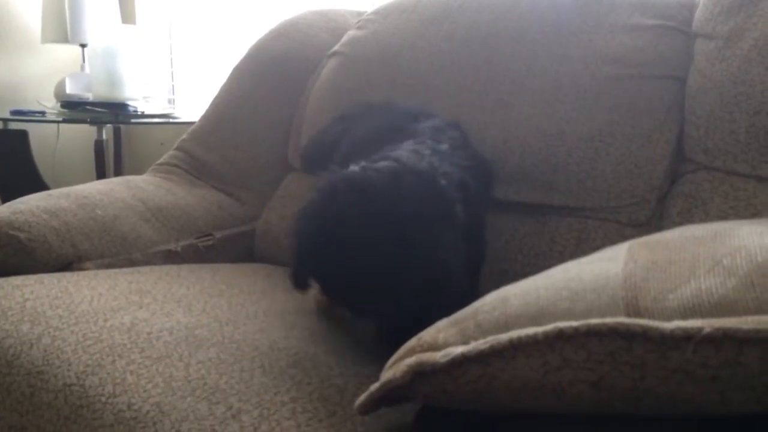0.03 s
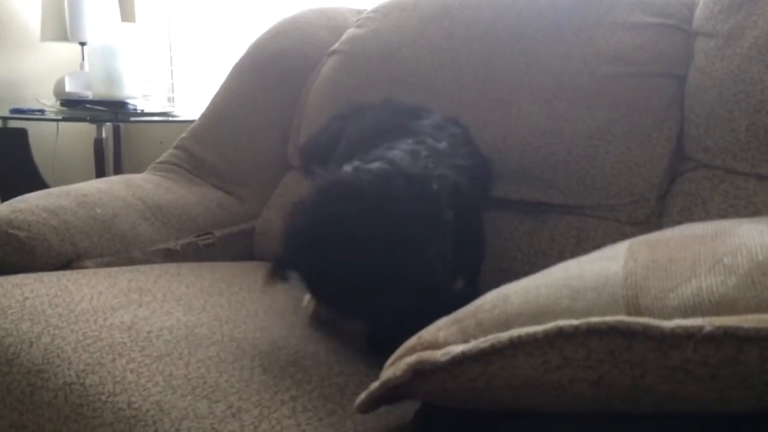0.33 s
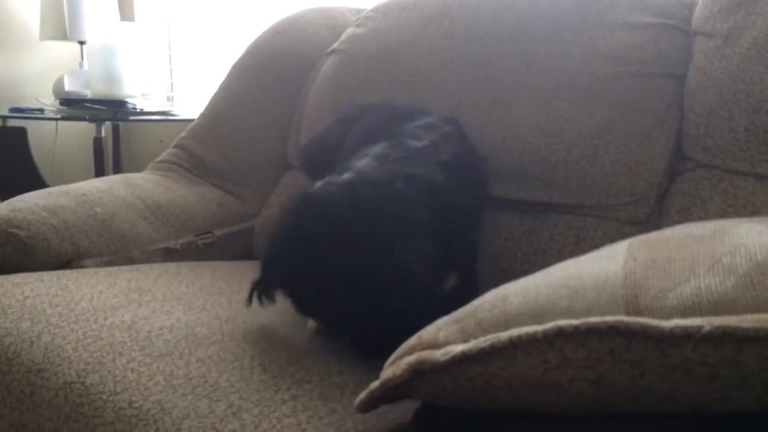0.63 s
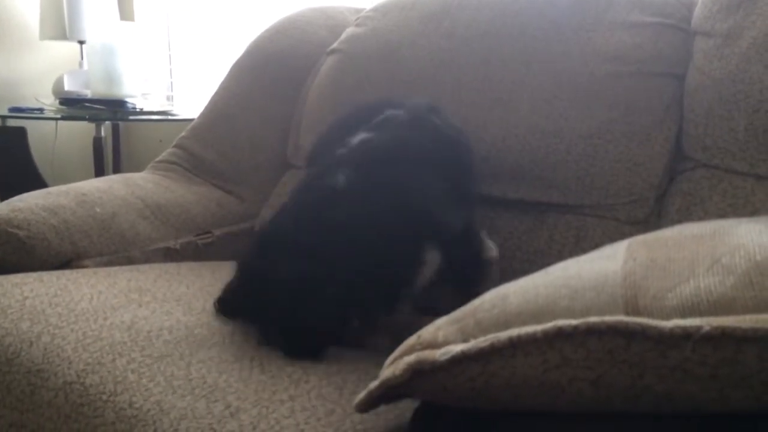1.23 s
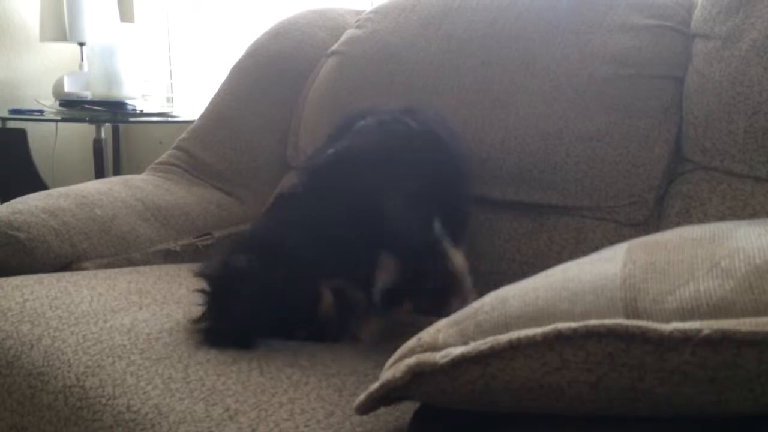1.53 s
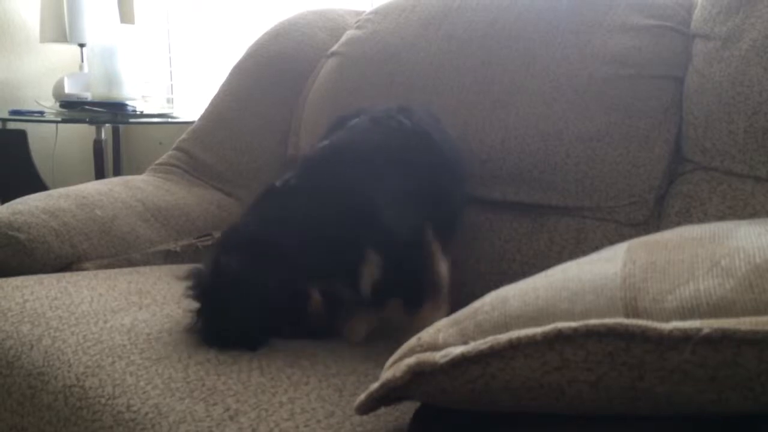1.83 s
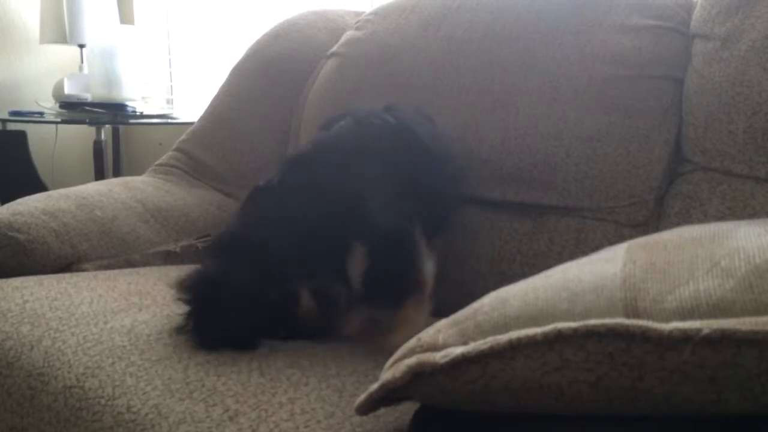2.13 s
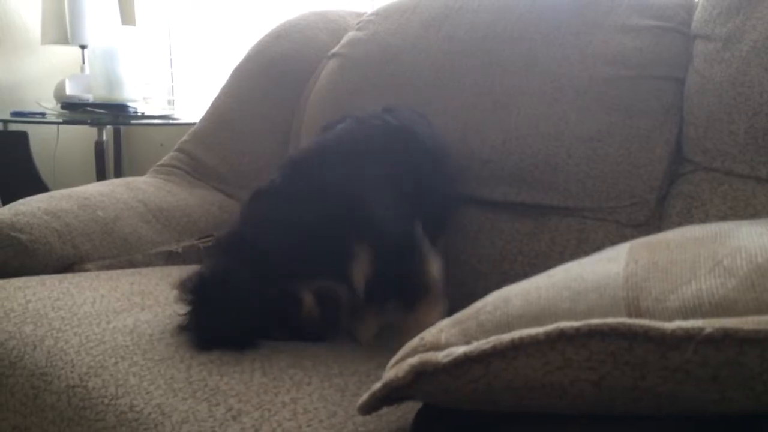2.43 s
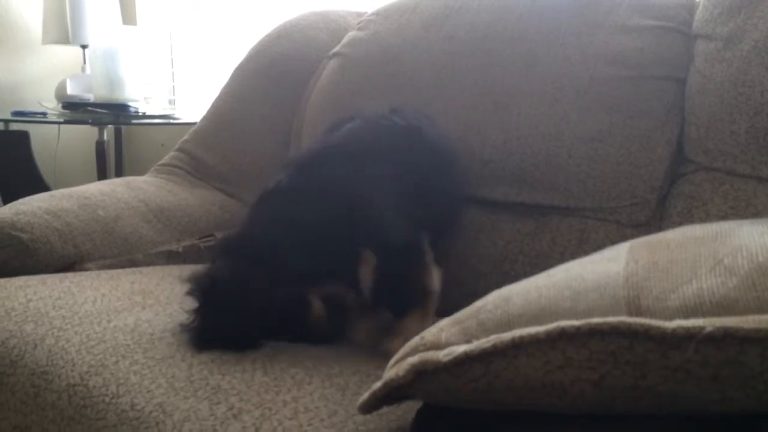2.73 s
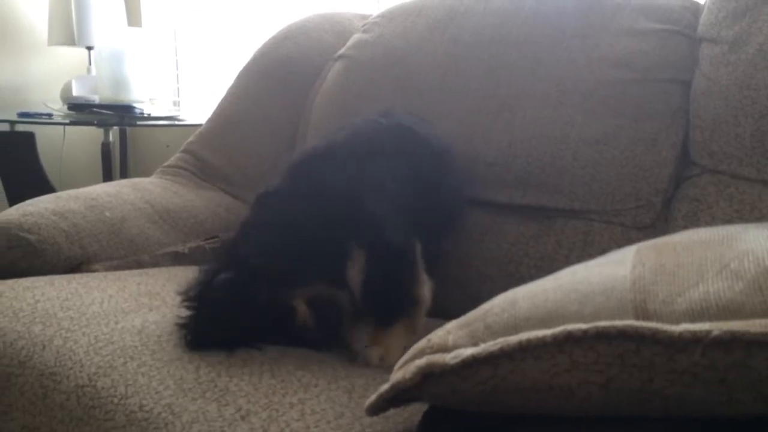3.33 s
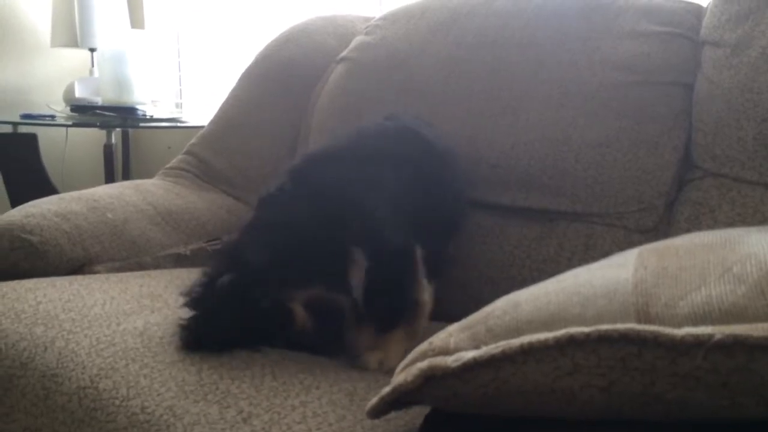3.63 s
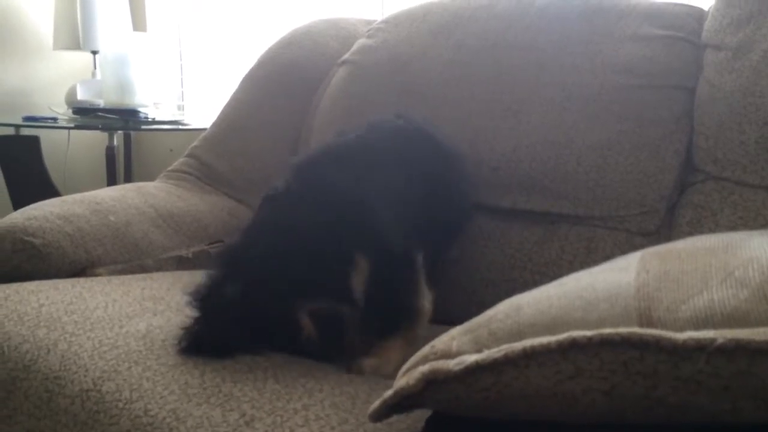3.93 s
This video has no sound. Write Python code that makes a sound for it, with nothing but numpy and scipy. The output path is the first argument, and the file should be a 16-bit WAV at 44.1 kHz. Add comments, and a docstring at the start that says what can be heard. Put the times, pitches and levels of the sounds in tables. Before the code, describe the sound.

A dog scratches at a couch cushion, first with a few spaced swipes, then digging quickly with both paws. Claws scrape and pluck the cloth over soft, padded thumps, in a quiet room with a faint steady rumble.

```python
"""A quiet living room, where a small dog digs at a couch cushion: a few slow swipes, then both paws in turn.
The claws stick and slip over the tight cloth while the pads brush it; now and then a claw snags
and plucks it. The stuffing thumps under the paws, the hardest pushes drum the cover,
and the room echoes faintly over its own steady noise."""
import sys
import numpy as np
from scipy import signal
from scipy.io import wavfile

SR = 44100
rng = np.random.default_rng(int(sys.argv[2]) if len(sys.argv) > 2 else 0)


def store_pcm(level_fs):
    """Save levels as 16-bit WAV."""
    pcm = np.round(np.clip(level_fs, -1, 1) * 32767).astype(np.int16)
    wavfile.write(sys.argv[1], SR, np.atleast_2d(pcm).T)


N = 176400  # 4 seconds

SLIPS_PER_S, SLIP_JITTER, SLIP_SPREAD_DB = 290, .3, 1.66
SAG_OCTAVES, PITCH_SPREAD_OCTAVES = 0.42, 0.37  # the cloth's note sinks along each stroke
# The tone of the cloth and of its fine fibres. Each row: frequency in Hz, boost or cut in dB.
CLOTH_TONE = [(40, -14), (110, 6), (200, -1.5), (285, -1), (400, 0.5), (640, -1.5), (830, -3), (1300, 0.5),
              (2000, -0.5), (3000, -7), (6000, -25), (15000, -22)]
FIBRE_TONE = [(60, -23), (250, 1), (700, 6), (1300, -3.5), (2000, -14), (3000, -25), (6000, -37),
              (15000, -62)]
# The paw strokes. Each row: start in seconds, length in seconds, scrape level in dB,
# brush level in dB, the cloth's pitch at mid-stroke in Hz.
PAW_STROKES = [(-.04, 0.059, -36.5, -81, 533), (0.193, 0.078, -34.3, -59.5, 563),
               (.451, 0.063, -35.5, -61.5, 504), (0.563, 0.068, -62, -70.5, 493),
               (.715, .067, -40.5, -63.5, 570), (1.163, 0.074, -40.5, -71, 470),
               (1.333, 0.049, -47, -71.5, 457), (1.485, 0.072, -43, -67.5, 470),
               (1.667, 0.042, -44, -69, 352), (1.806, 0.057, -39.5, -65, 440),
               (1.966, 0.051, -42.5, -68.5, 450), (2.112, 0.066, -44.5, -67.5, 430),
               (2.27, 0.059, -46.5, -69.5, 480), (2.421, 0.058, -39.5, -66, 530),
               (2.573, 0.041, -44, -69, 480), (2.694, 0.12, -53.5, -72.5, 420),
               (2.885, 0.051, -44.5, -65.5, 494), (3.058, 0.043, -43.5, -65, 484),
               (3.188, 0.046, -39.5, -64.5, 514), (3.389, 0.041, -48, -75, 460),
               (3.492, 0.055, -42.5, -63.5, 575), (3.683, 0.047, -48.5, -72.5, 418),
               (3.815, 0.039, -39.5, -62.5, 620), (3.977, 0.063, -47, -60.5, 500)]


def claw_scrapes():
    """Claws slip from thread to thread in an uneven run of tiny plucks, while the fibres crackle."""
    out, t = np.zeros(N), np.arange(SR // 4) / SR
    for start, length, db, _, hz in PAW_STROKES:
        gaps, sizes, detunes = rng.standard_normal((3, 120))
        slip_times = np.cumsum(np.exp(SLIP_JITTER * gaps)) / SLIPS_PER_S
        slips = np.zeros(len(t))
        for at, size, detune in zip(slip_times, sizes, detunes):
            octaves = SAG_OCTAVES * (.5 - min(at / length, 1)) + PITCH_SPREAD_OCTAVES * detune
            strength = amp(SLIP_SPREAD_DB * np.clip(size, -2, 1))
            add(slips, at, strength * pluck(hz * 2 ** octaves, cycles=0.54))
        cloth = unit(colour(slips - slips.mean(), CLOTH_TONE))
        fibres = unit(colour(crackle(len(t), per_s=2500, spread_db=9), FIBRE_TONE))
        push = paw_pressure(t, length, rise=0.27, release=0.29, tail_s=0.0094)
        add(out, start, amp(db) * (cloth + amp(-7) * fibres) * push)
    return out


BRUSH_LEAD_S, SWIPES_END_S = 0.013, 1  # pads touch before the claws; the opening swipes end
WEAVE_HZ = (9200, 10100)
# The tone of the brushing. Each row: frequency in Hz, boost or cut in dB.
BRUSH_TONE = [(200, -26), (1200, -0.5), (2500, 7.5), (4000, 2.5), (6000, -2.5), (10000, -5.5), (12500, -9),
              (15000, -9)]


def pad_brushing():
    """Pads and fur hiss over the cloth on each stroke; the opening swipes make the weave zip, the loudest swipe
    most of all."""
    t, swipes, digs = np.arange(N) / SR, np.zeros(N), np.zeros(N)
    for start, length, _, db, _ in PAW_STROKES:
        age, span = t - start + BRUSH_LEAD_S, length + BRUSH_LEAD_S
        if start < SWIPES_END_S:  # a swipe lands already moving and fades as the paw slows
            fade_db = -2.5 * np.clip(age / span, 0, 1)
            swipes += amp(db + fade_db) * paw_pressure(age, span, rise=0.37, release=0.049, tail_s=0.043)
        else:  # a digging paw sets down first, so its hiss builds more slowly
            digs += amp(db) * paw_pressure(age, span, rise=0.61, release=0.049, tail_s=0.045)
    hiss = unit(colour(crackle(N, per_s=3000, spread_db=3.5), BRUSH_TONE))
    noise = rng.standard_normal(N)
    zipping = unit(sum(resonate(noise, hz, width_hz=520) for hz in WEAVE_HZ))
    zip_level = amp(-8) * swipes ** 2 / swipes.max()
    return (swipes + digs) * hiss + zip_level * zipping


# The snags. Each row: start in seconds, level in dB, pitch in Hz.
CLAW_SNAGS = [(.016, -26, 533), (0.2034, -32, 850), (0.2091, -29, 600), (.2464, -28, 760),
              (.449, -32.5, 650), (.7483, -31.5, 580), (1.1983, -25.5, 480), (1.535, -29, 400),
              (1.789, -35.5, 704), (1.8101, -21.5, 690), (1.852, -35.5, 450), (2.105, -31, 650),
              (2.151, -26.5, 506), (2.4124, -22, 640), (2.4462, -25, 617), (2.4857, -32.5, 380),
              (2.7286, -33, 640), (2.744, -33.5, 630), (2.9034, -30, 1050), (3.0557, -30.5, 543),
              (3.0855, -31, 543), (3.181, -39, 600), (3.3207, -37, 744), (3.367, -31, 527),
              (3.6406, -33.5, 680), (3.689, -29.5, 560), (3.8238, -28, 724), (3.9423, -34, 460),
              (3.979, -22.5, 705)]


def claw_snags():
    """A claw catches the cloth and lets go with one hard pluck."""
    pops = np.zeros(N)
    for start, db, hz in CLAW_SNAGS:
        add(pops, start, amp(db) * pluck(hz, cycles=0.53))
    return colour(pops, CLOTH_TONE)


TICK_DECAY_S = 0.00095
SNAP_AT_S, SNAP_DB, SNAP_HZ, SNAP_DECAY_S = 2.4855, -41.5, 4000, .00055
# The tone of a tick. Each row: frequency in Hz, boost or cut in dB.
TICK_TONE = [(300, 10), (2500, 4), (4200, 7.5), (7500, 9.5), (11000, 8), (15000, -2)]
# The ticks. Each row: start in seconds, level in dB before the tone is applied.
CLAW_TICKS = [(.269, -59), (.449, -57.5), (.715, -59.5), (0.719, -61), (.735, -59), (2.448, -61),
              (2.4856, -50.5)]


def claw_ticks():
    """Claw tips tick faintly across threads, and one claw snaps free with a short, bright ring."""
    ticks, t = np.zeros(N), np.arange(SR // 100) / SR
    for start, db in CLAW_TICKS:
        add(ticks, start, amp(db) * rng.choice([-1, 1], len(t)) * np.exp(-t / TICK_DECAY_S))
    out = colour(ticks, TICK_TONE)
    add(out, SNAP_AT_S, amp(SNAP_DB) * np.sin(2 * np.pi * SNAP_HZ * t) * np.exp(-t / SNAP_DECAY_S))
    return out


THUMP_RISE_S = 0.0069
# Paws pressing into the cushion. Each row: start in seconds, relative level in dB, pitch in Hz.
PAW_PUSHES = [(.025, -36, 142), (.208, -34.5, 177), (0.267, -28, 141), (.503, -32.5, 149),
              (0.749, -35.5, 169), (1.183, -35.5, 189), (1.508, -28.5, 161.5), (1.668, -31, 153),
              (1.809, -33.5, 128), (1.831, -30, 112), (1.969, -32.5, 151), (2.13, -34, 120),
              (2.376, -36, 111), (2.435, -37, 117), (2.692, -37.5, 118), (2.748, -34, 117),
              (2.896, -38.5, 184), (3.001, -38.5, 122), (3.052, -38, 138), (3.086, -34, 163),
              (3.204, -39, 152), (3.345, -35, 115), (3.511, -40, 154), (3.665, -32.5, 110),
              (3.705, -35.5, 114), (3.941, -41.5, 118)]


def cushion_thumps():
    """The stuffing booms briefly under each push: a main note, one above it and one below."""
    out, t = np.zeros(N), np.arange(SR // 8) / SR
    swell = t / THUMP_RISE_S * np.exp(1 - t / THUMP_RISE_S)
    for start, db, hz in PAW_PUSHES:
        low_phase, high_phase = 2 * np.pi * rng.random(2)
        phase = 2 * np.pi * hz * t
        above = amp(-6) * np.sin(1.605 * phase + high_phase)
        below = amp(-5) * np.sin(0.675 * phase + low_phase)
        add(out, start, amp(db - 7.5) * swell * unit(above + below - np.sin(phase)))
    return out


COVER_HZ, COVER_DECAY_S = (421, 648.6), 0.014
# The hardest pushes. Each row: start in seconds, level in dB.
HARD_PUSHES = [(1.1955, -32), (1.2105, -35.5), (3.8245, -36)]


def cover_knocks():
    """The stretched cover rings like a slack drum when pushed hard."""
    out, t = np.zeros(N), np.arange(SR // 8) / SR
    ring = -sum(np.sin(2 * np.pi * hz * t) for hz in COVER_HZ) * np.exp(-t / COVER_DECAY_S)
    for start, db in HARD_PUSHES:
        add(out, start, amp(db) * ring)
    return out


DIG_BUILDS_S = (0.77, 1.33)
# The low rumble of the swaying seat. Each row: frequency in Hz, boost or cut in dB.
SWAY_TONE = [(20, -28), (40, -30), (60, -4), (115, -1), (170, -4), (300, -24), (1000, -53.5)]


def shuffling():
    """The dog's weight sways the seat and small plucks fill the gaps; both grow as the digging begins."""
    busy = np.interp(np.arange(N) / SR, DIG_BUILDS_S, [.35, 1])
    tugs = crackle(N, per_s=70, spread_db=6.0)
    plucks = colour(signal.fftconvolve(tugs, pluck(hz=362, cycles=0.74))[:N], CLOTH_TONE)
    sway = colour(rng.standard_normal(N), SWAY_TONE)
    return busy * (amp(-60.5) * unit(plucks) + amp(-59.5) * unit(sway))


# The couch's own notes. Each row: pitch in Hz, level in dB compared with the direct sound.
COUCH_NOTES = [(114, -4), (192, 2.5), (330, -7.5), (474, -10.5), (685, -5.5)]


def couch_ring(dog):
    """The digging makes the couch ring at a few low notes."""
    return sum(amp(db) * resonate(dog, hz, width_hz=17.9) for hz, db in COUCH_NOTES)


# How long the room echoes. Each row: frequency in Hz, seconds to fade by 60 dB.
ECHO_TIMES = [(100, 0.27), (500, 0.35), (2000, 0.35), (10000, 0.63)]


def room_echo(sound):
    """Scattered reflections start after 5 ms and die away, the treble lasting longest."""
    bounces = crackle(SR // 2, per_s=3000, spread_db=8.0) * (np.arange(SR // 2) > .005 * SR)
    hz, t, bands = signal.stft(bounces, SR, nperseg=256)
    fade = amp(-60 * t / look_up(ECHO_TIMES, hz)[:, None])
    tail = signal.istft(bands * fade, SR, nperseg=256)[1]
    return signal.fftconvolve(sound, tail / np.linalg.norm(tail))[:N]


# The tone of the room's noise. Each row: frequency in Hz, boost or cut in dB.
ROOM_TONE = [(20, -43), (35, -10), (55, 0), (130, -9.5), (190, 2), (310, -7.5), (700, -8.5), (1000, -13),
             (1500, -14.5), (2200, -21), (3000, -30), (6000, -35), (10000, -39.5), (15000, -43.5)]


def room_noise():
    """A soft, steady rumble with a little hiss."""
    return amp(-56) * unit(colour(rng.standard_normal(N), ROOM_TONE))


def paw_pressure(t, length, rise, release, tail_s):
    """A paw bears down, holds, eases off and lifts; rise and release are shares of the length."""
    down = np.clip(t / (rise * length), 0, 1)
    easing = np.clip((t / length - 1 + release) / release, 0, 1)
    return down * (1 - .5 * easing) * np.exp(-np.maximum(t - length, 0) / tail_s)


def pluck(hz, cycles):
    """Tight cloth springs back and the stuffing stills it; more cycles means a longer ring."""
    turns = np.arange(SR // 50) / SR * hz
    wave = -np.sin(2 * np.pi * turns) * np.exp(-turns / cycles) * (1 - np.exp(-turns / 0.12))
    return wave / abs(wave).max()


def crackle(count, per_s, spread_db):
    """Random clicks of uneven size."""
    chance, size = rng.random(count), rng.standard_normal(count)
    return (chance < per_s / SR) * amp(spread_db * np.clip(size, -2, 2)) * rng.choice([-1, 1], count)


def colour(x, tone):
    """Boosts and cuts a sound's frequencies as a tone table says."""
    log_gain = np.log(amp(look_up(tone, abs(np.fft.fftfreq(4096, 1 / SR)))))
    taps = np.fft.ifft(np.exp(np.conj(signal.hilbert(log_gain)))).real  # rings only after a click
    return signal.fftconvolve(x, taps[:len(taps) // 2])[:len(x)]


def resonate(x, hz, width_hz):
    """Keeps a narrow band around one pitch."""
    return signal.lfilter(*signal.iirpeak(hz, hz / width_hz, SR), x)


def look_up(table, hz):
    """Reads between a table's rows, with octaves evenly spaced."""
    row_hz, values = np.transpose(table)
    return np.interp(np.log(hz + 1), np.log(row_hz + 1), values)


def add(mix, start_s, sound):
    """Mixes a sound in at a given time."""
    at = round(start_s * SR)
    sound = sound[max(-at, 0):]
    part = mix[max(at, 0):][:len(sound)]
    part += sound[:len(part)]


def amp(db):
    """Turns decibels into a multiplier."""
    return 10 ** (np.asarray(db) / 20)


def unit(x):
    """Scales a sound to an average (rms) level of 1."""
    return x / np.sqrt(np.mean(x ** 2) + 1e-20)


def scene():
    """The dog on the ringing couch, with the room's echo and steady noise."""
    dog = claw_scrapes() + pad_brushing() + claw_snags() + claw_ticks()
    dog += cushion_thumps() + cover_knocks() + shuffling()
    dog += couch_ring(dog)
    return (dog + room_noise() + amp(-9.5) * room_echo(dog))[None]


def record(dry):
    """Cuts the highest treble, above 15300 Hz."""
    treble_cut = signal.firwin(511, 15300, window=("kaiser", 8), fs=SR)
    return signal.oaconvolve(dry, treble_cut[None], "same")


dry = scene()
out = record(dry)
store_pcm(out)
```